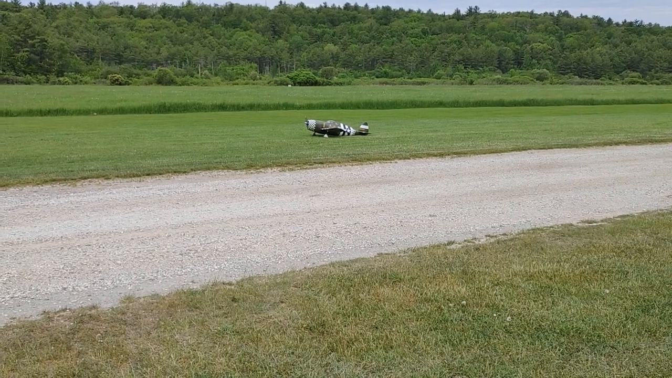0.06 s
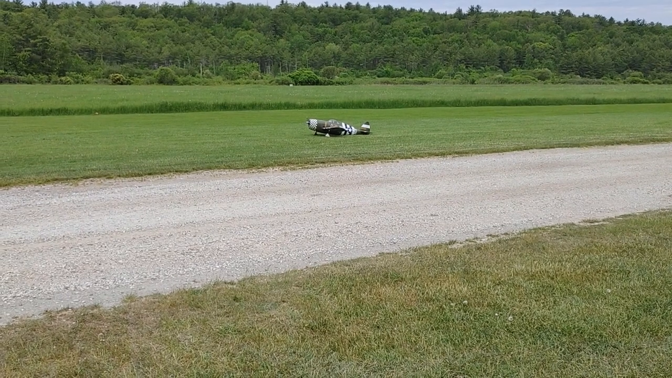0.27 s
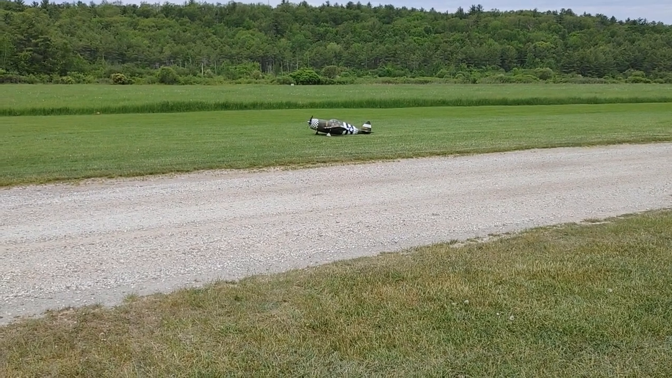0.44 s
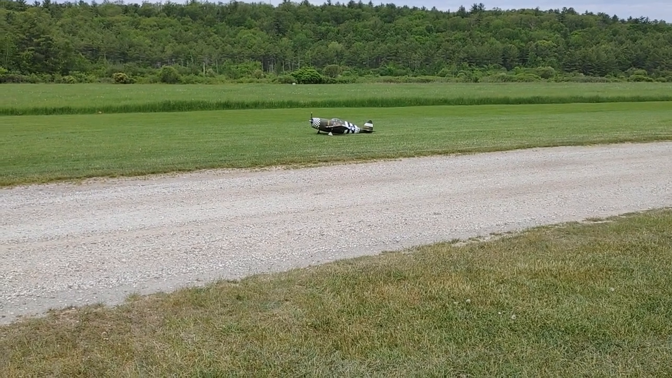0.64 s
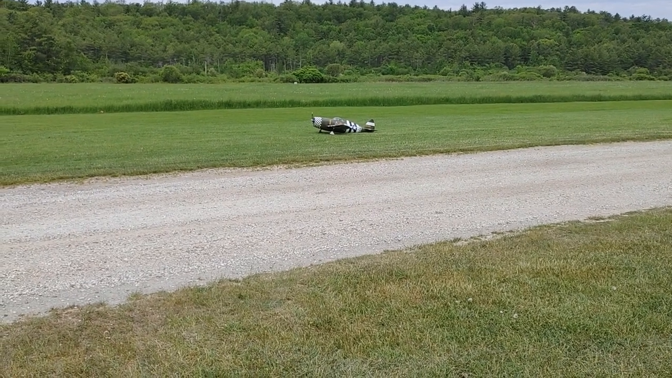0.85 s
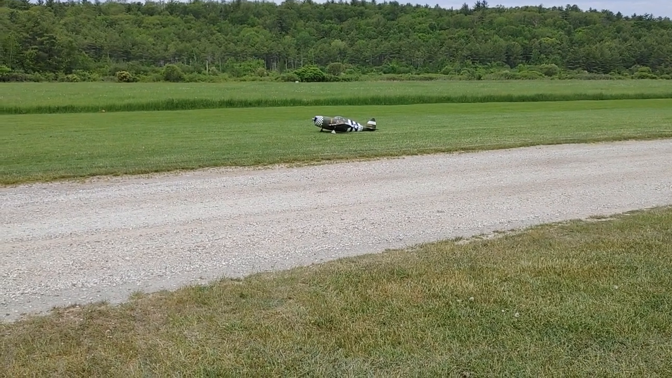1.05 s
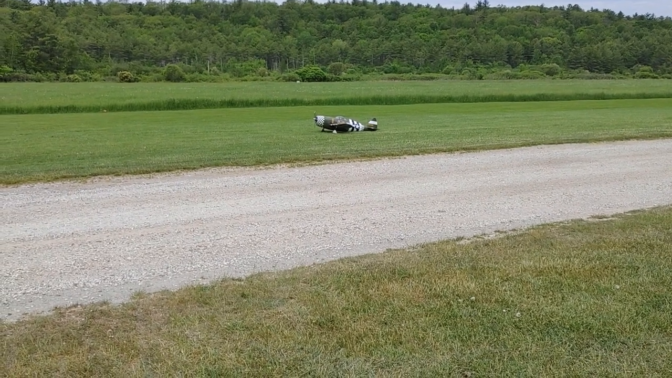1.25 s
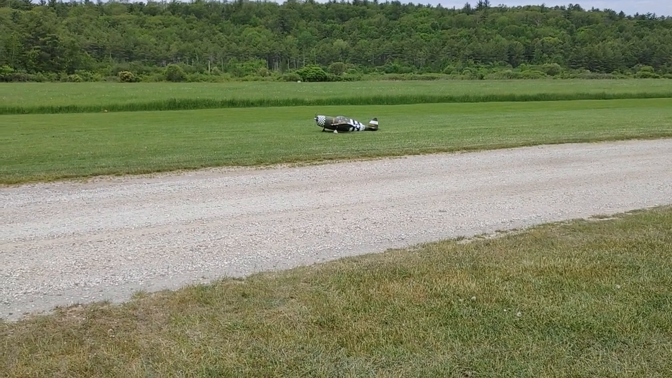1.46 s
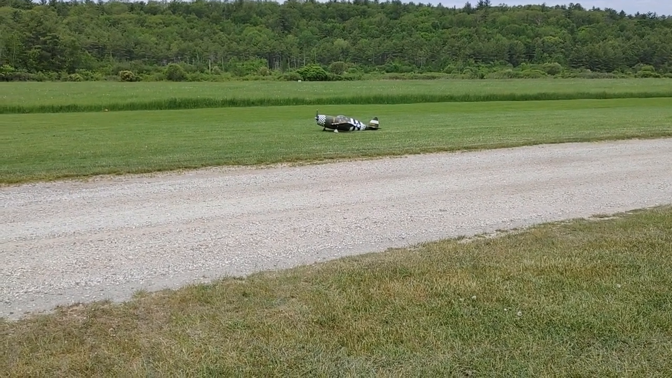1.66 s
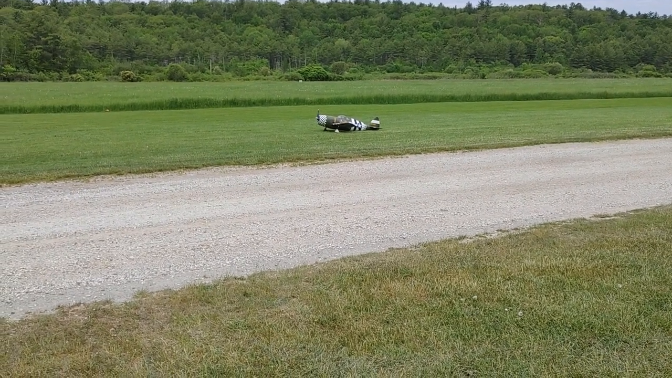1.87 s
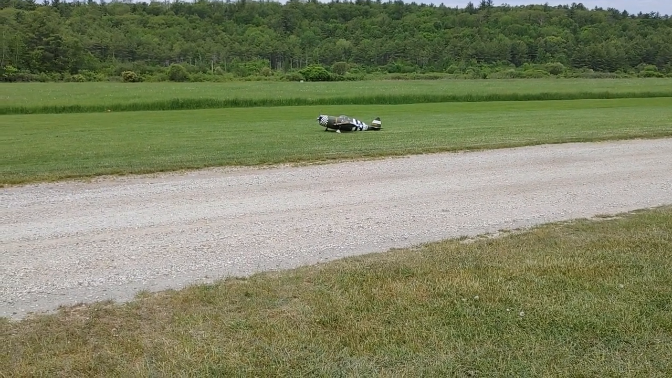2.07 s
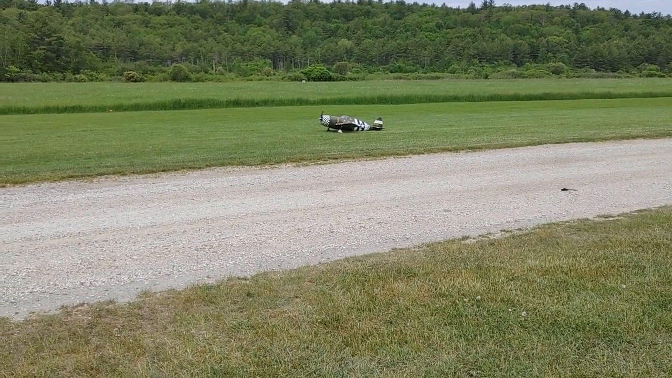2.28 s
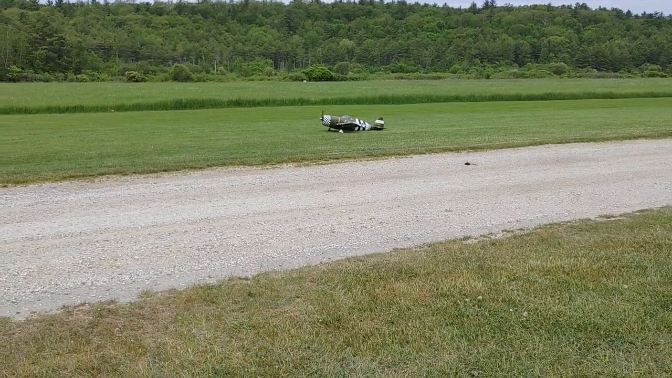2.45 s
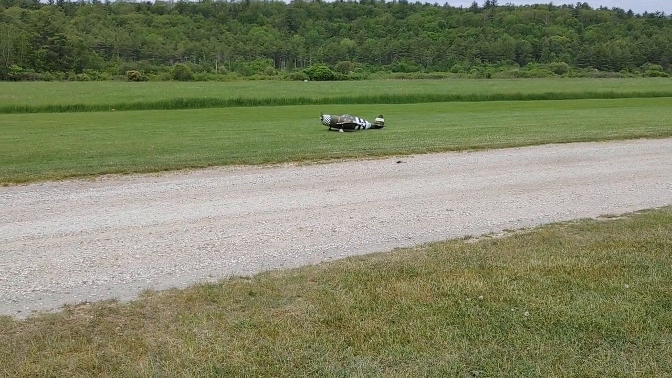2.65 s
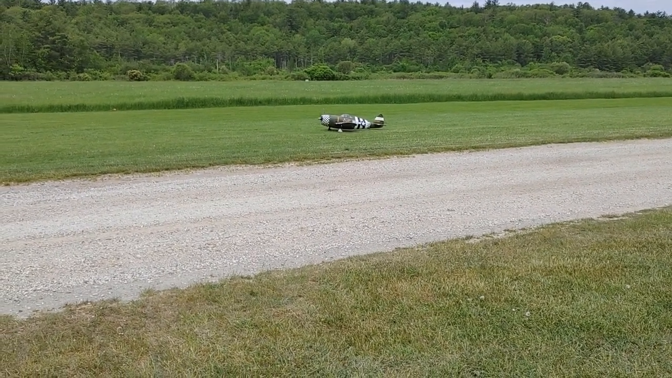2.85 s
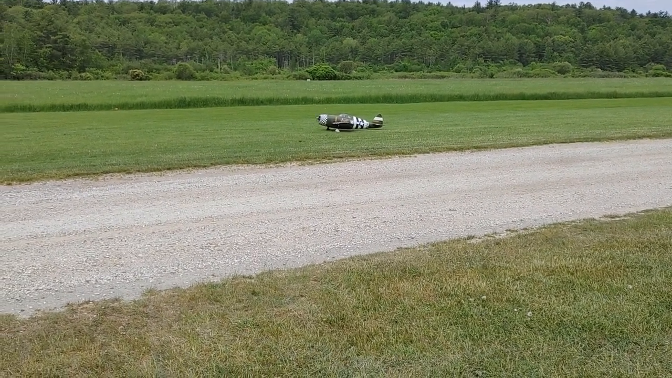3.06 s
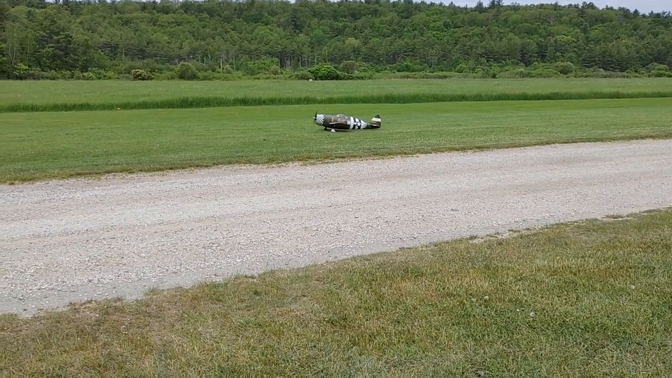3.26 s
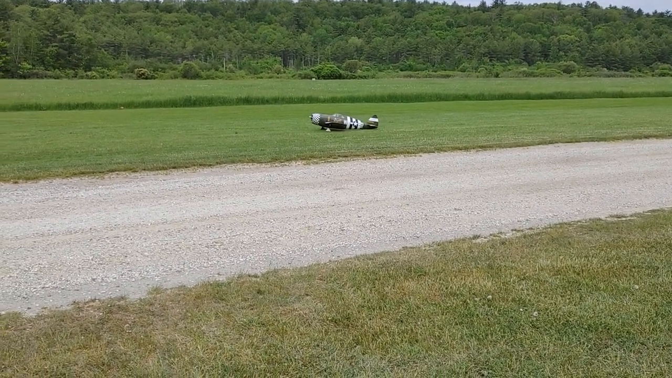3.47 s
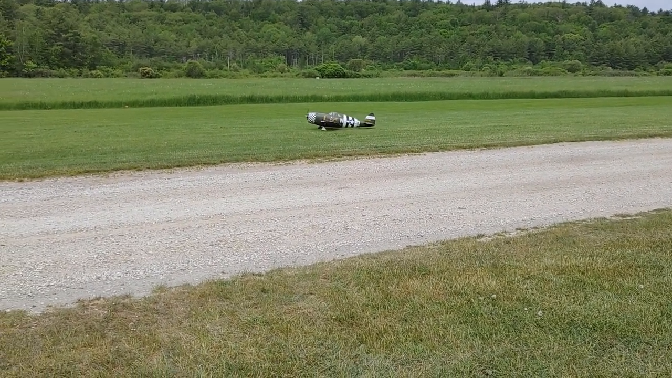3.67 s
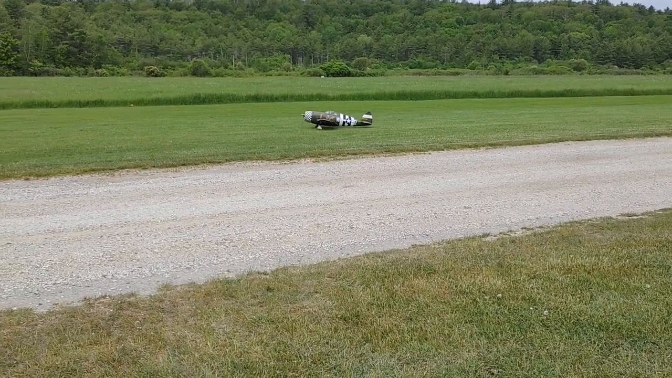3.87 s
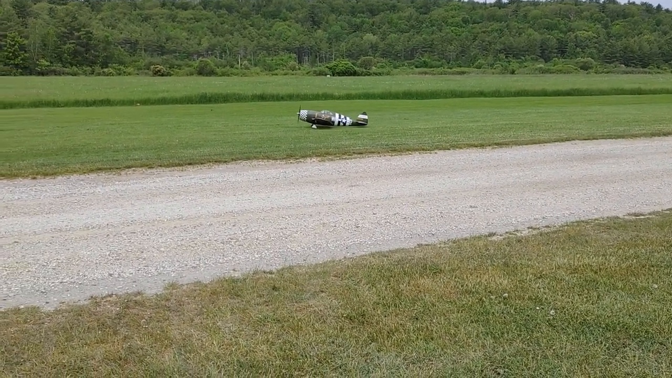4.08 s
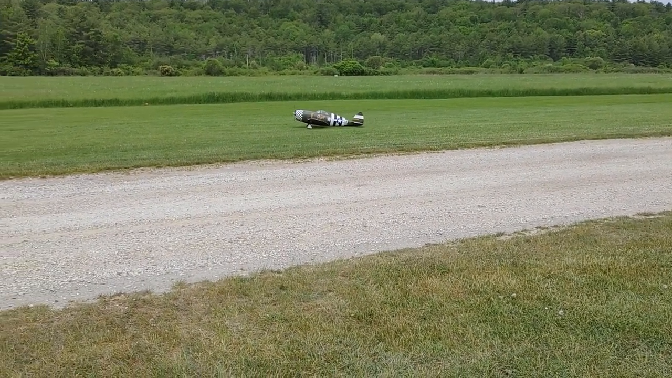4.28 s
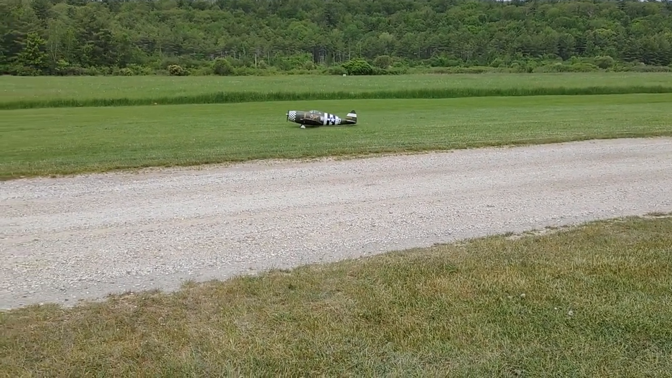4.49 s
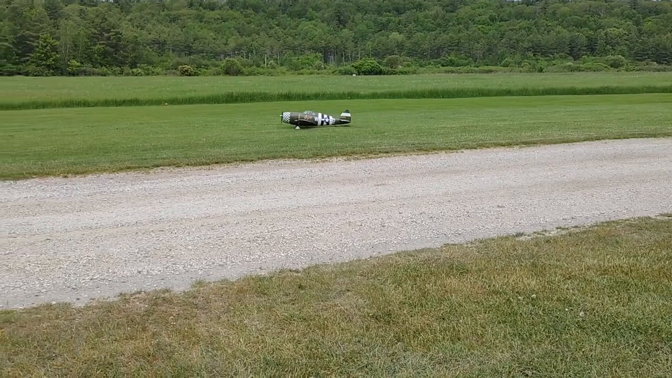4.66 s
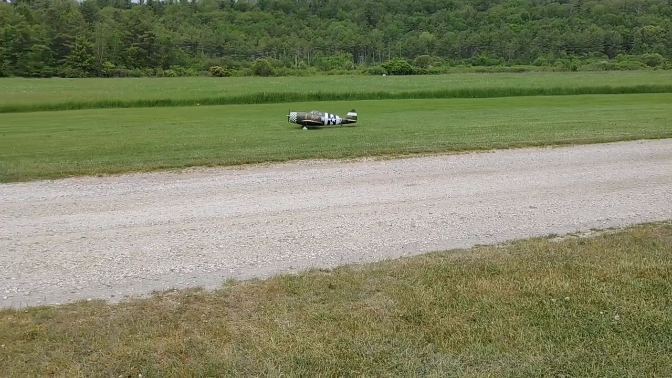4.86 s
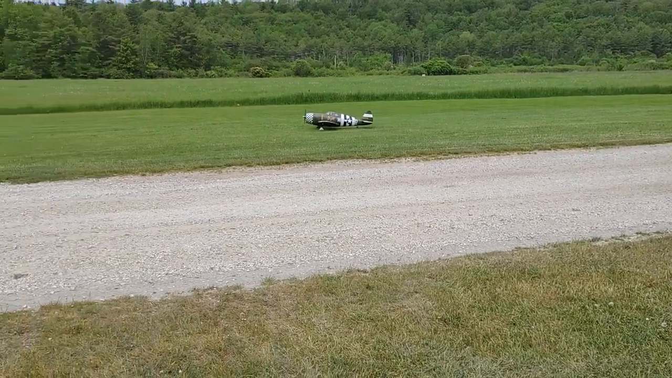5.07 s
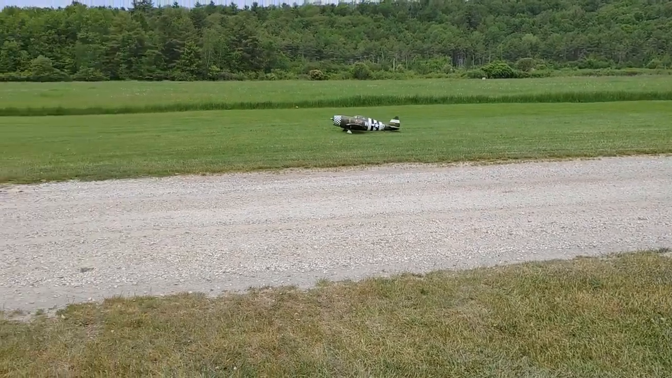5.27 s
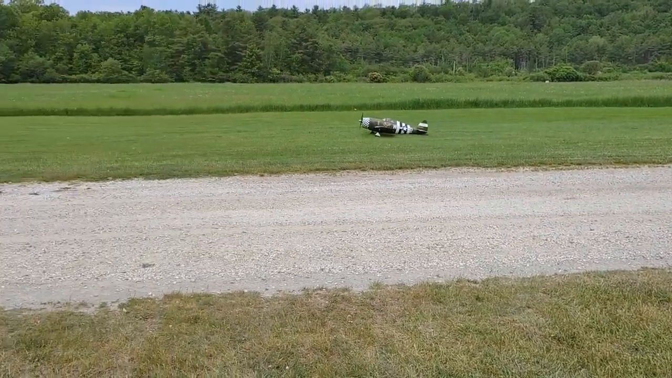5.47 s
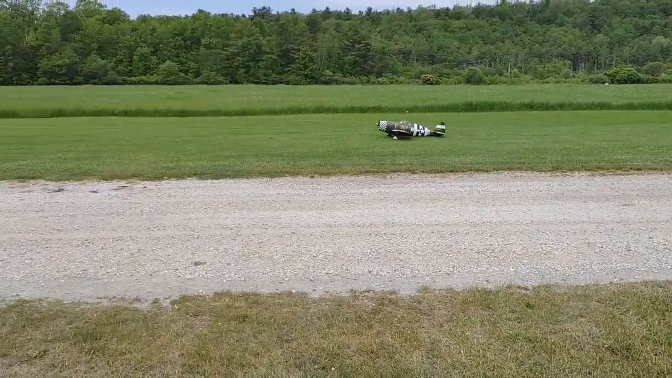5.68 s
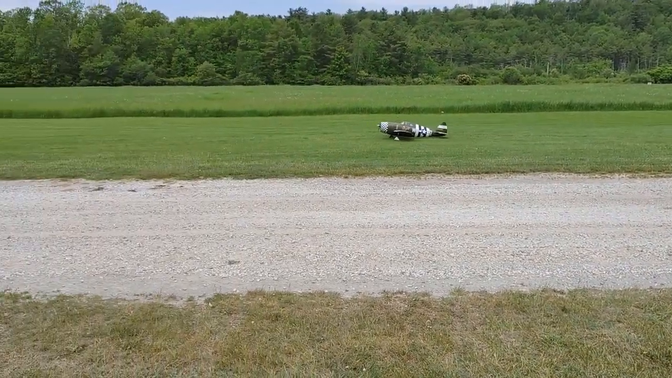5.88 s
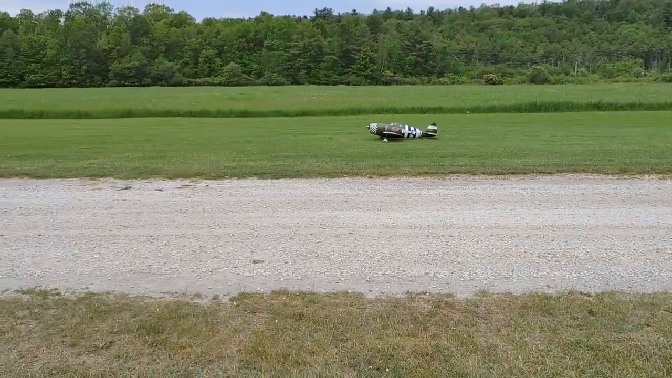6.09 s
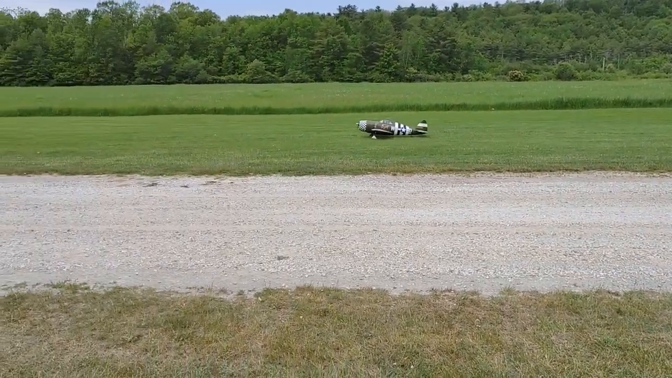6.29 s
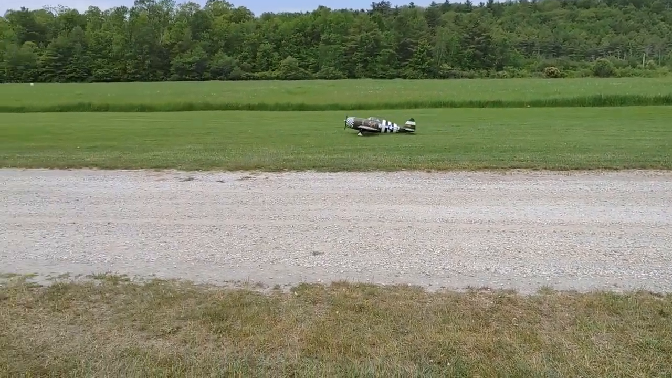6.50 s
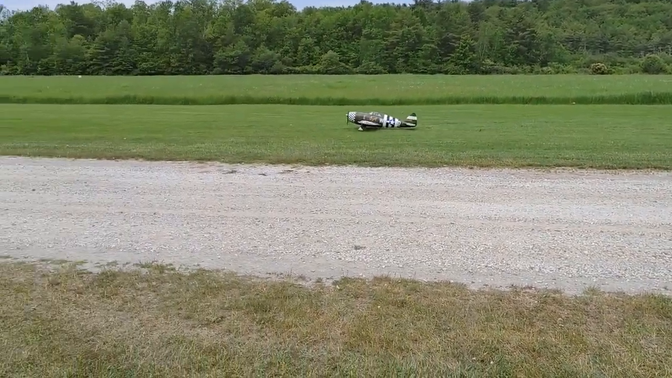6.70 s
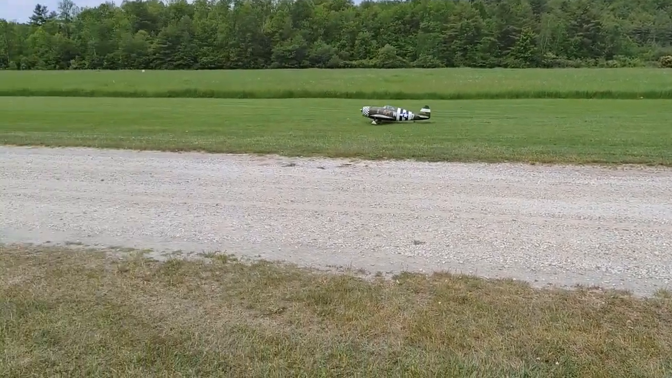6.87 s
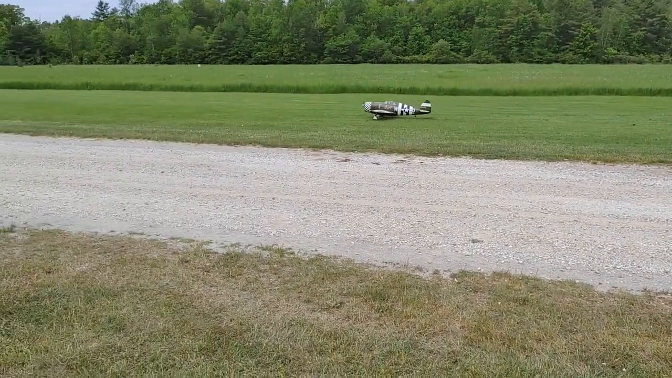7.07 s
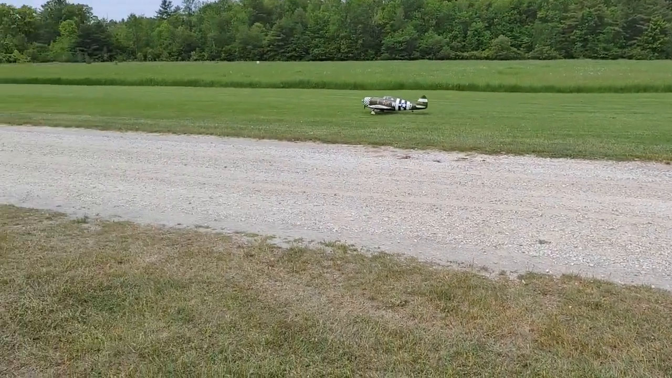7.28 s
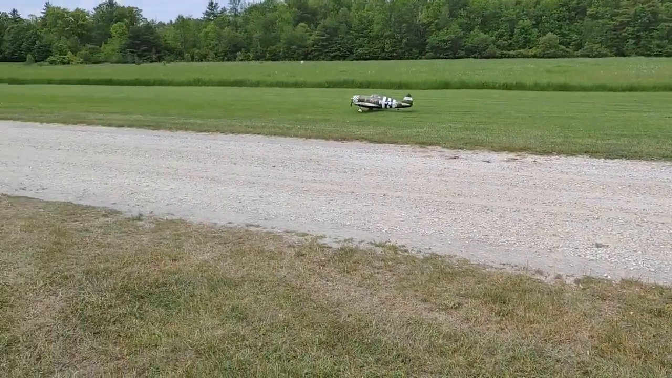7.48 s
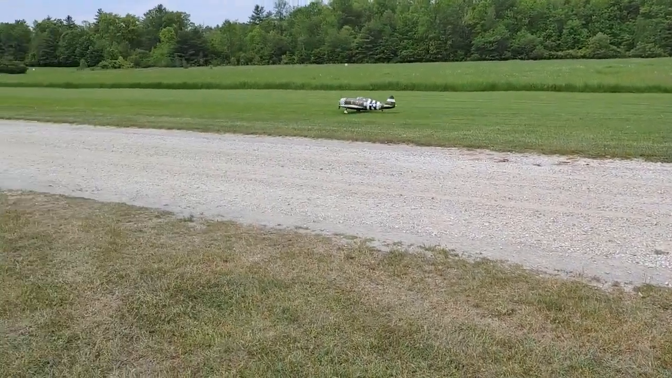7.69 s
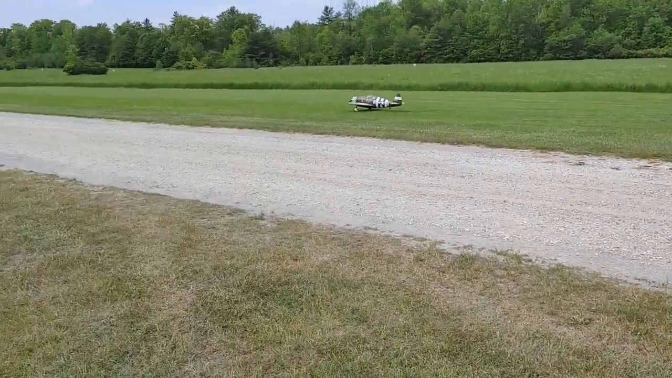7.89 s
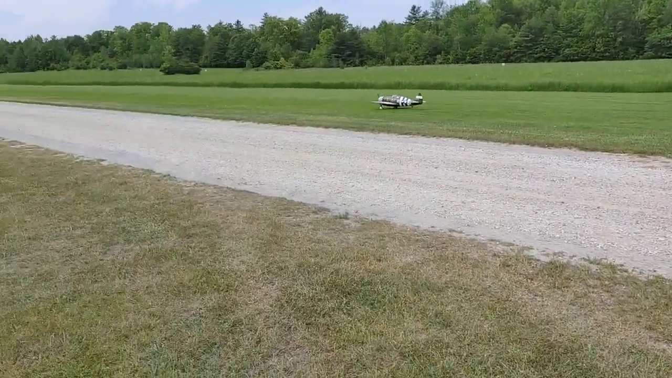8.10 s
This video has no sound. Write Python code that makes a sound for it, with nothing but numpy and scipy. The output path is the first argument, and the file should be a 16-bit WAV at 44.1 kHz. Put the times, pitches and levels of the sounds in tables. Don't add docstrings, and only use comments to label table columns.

```python
import sys
import numpy as np
from scipy import signal
from scipy.fft import rfft, irfft, next_fast_len
from scipy.io import wavfile
from scipy.ndimage import uniform_filter1d, map_coordinates

SR = 44100
rng = np.random.default_rng(int(sys.argv[2]) if len(sys.argv) > 2 else 0)


def linear_from_db(decibels):
    return 10 ** (np.asarray(decibels, float) / 20)


def store_pcm(level_fs):
    pcm = np.round(np.clip(level_fs, -1, 1) * 32767).astype(np.int16)
    wavfile.write(sys.argv[1], SR, np.atleast_2d(pcm).T)


N = 358964
TIME = np.arange(N) / SR

# time in s, shaft speed in turns/s, load level in dB.
THROTTLE = [(0, 36.2, 8), (2.33, 31.3, 11.5), (2.55, 46, 3), (2.66, 53.5, 1.5), (3.68, 55.3, 1),
            (3.85, 49.8, 2.5), (4.218, 56.18, 0.5), (4.423, 64.17, -0.5), (4.619, 67.8, -1),
            (5.18, 68.04, 0), (5.701, 62.22, -1), (6.53, 62.75, -0.5), (6.62, 66.46, 2), (6.85, 84.2, -1.5),
            (7.291, 84.4, -3.5), (7.7, 88.2, -3), (7.911, 88.8, -4.5), (8.14, 91, -4.5)]
# shaft speed in turns/s, level in dB.
CRACK_LAW = [(31, -68), (50, -47), (62, -34.5), (68, -38.5), (80, -33.5), (91, -32)]
AIR_LAW = [(31, -44.5), (51, -42), (63, -33.5), (72, -29.5), (91, -24)]
# centre in Hz, width in Hz, level in dB.
BLOWDOWN = [(227.7, 232, 2.5)]
SURGE_BARK = .07


def unit(x):
    return x / np.sqrt(np.mean(x ** 2) + 1e-20)


def along(points, hz):
    f, v = np.transpose(points)
    return np.interp(np.log(hz + 1), np.log(f + 1), v)


def filtered(x, response):
    m = next_fast_len(N + 8192)
    return irfft(rfft(x, m) * response(np.fft.rfftfreq(m, 1 / SR)), m)[..., :N]


def shaped_noise(spectrum):
    return unit(filtered(rng.standard_normal((2, N)), lambda f: linear_from_db(along(spectrum, f))))


def modes(rows):
    def response(f):
        total = 0
        for k, (c, w, db) in enumerate(rows):
            total = total + (-1) ** k * linear_from_db(db) * 1j * f * w / (c * c - f * f + 1j * f * w)
        return total
    return response


def wobble(rate_hz):
    return map_coordinates(rng.standard_normal(int(N * rate_hz / SR) + 4), [TIME * rate_hz])


def spikes(times, sizes):
    at = np.round(times * SR).astype(int)
    inside = (at >= 0) & (at < N)
    return np.bincount(at[inside], sizes[inside], N)


def puffs(times, sizes, t60):
    t = np.arange(SR // 10) / SR
    shape = linear_from_db(-60 * t / t60) * (1 - np.exp(-t / .0008))
    return signal.fftconvolve(spikes(times, sizes), shape)[:N] * rng.standard_normal((2, N))


def shaft_hz(at=TIME):
    s, hz, load_db = np.transpose(THROTTLE)
    return np.interp(at, s, hz)


def level(law, at=TIME):
    s, hz, load_db = np.transpose(THROTTLE)
    return np.interp(shaft_hz(at), *np.transpose(law)) + np.interp(at, s, load_db)


def surge(at=TIME):
    return np.maximum(shaft_hz(at + .02) - shaft_hz(at - .02), 0) / .04


def gas_heat():
    return np.clip((shaft_hz() - 66) / 20, 0, 1)


def crankshaft(firings):
    turns = np.cumsum(shaft_hz()) / SR
    at = np.interp(firings, TIME, turns)
    whole = np.cumsum(np.maximum(np.round(np.diff(at, prepend=at[0] - 1)), 1))
    slip = whole - at
    slip = np.where(firings > 2.65, uniform_filter1d(slip, size=5), slip)
    return turns + np.interp(TIME, firings, slip), whole.astype(int)


def combustion():
    # time in s, thump in dB, crack in dB re thump.
    idle_firings = [(0.025, -22, -29), (0.092, -20.5, -20), (0.217, -20.5, -23.5), (0.31, -18, -21.5),
                    (0.399, -19.5, -24.5), (0.525, -22.5, -32), (0.59, -20.5, -27), (0.653, -21, -26),
                    (0.718, -20.5, -28.5), (0.752, -21.5, -27), (0.849, -18.5, -29), (0.915, -27.5, -21),
                    (1.013, -21, -27.5), (1.079, -23.5, -22), (1.143, -23, -28), (1.306, -22.5, -24),
                    (1.4, -19.5, -22), (1.494, -18.5, -23), (1.551, -19.5, -29.5), (1.614, -22.5, -23),
                    (1.706, -20.5, -25), (1.897, -22, -29), (1.966, -23.5, -21), (2.031, -20.5, -25.5),
                    (2.097, -20, -23), (2.161, -21.5, -24), (2.291, -20, -27), (2.351, -19.5, -19),
                    (2.408, -16.5, -21.5)]
    half_burns = [.153, .246, .337, .461, .494, .815, .947, 1.208, 1.245, 1.334, 1.674, 1.768, 1.8, 1.832,
                  2.193, 2.38]
    # time in s, thump
    # in dB, crack in dB.
    hard_firings = [(2.462, -13, -30), (2.486, -13, -32), (2.508, -14.5, -33), (2.529, -14.5, -29),
                    (2.55, -14, -35), (2.57, -15, -34), (2.59, -16, -32), (2.609, -14.5, -33),
                    (2.627, -17, -32), (2.646, -13, -33), (2.666, -15, -34.5), (2.683, -14, -36),
                    (2.702, -14, -33), (2.741, -12.5, -33.5), (2.761, -20, -32), (2.778, -12.5, -34),
                    (2.816, -13, -28.5), (2.853, -13.5, -42), (2.873, -18, -41), (2.892, -14, -32.5),
                    (2.912, -16, -42), (2.93, -18, -36), (2.949, -13.5, -38), (2.969, -15.5, -35),
                    (2.987, -15, -37), (3.027, -13, -32), (3.044, -18, -36), (3.082, -12.5, -33),
                    (3.1, -12.5, -34), (3.12, -15, -35), (3.138, -12, -31), (3.176, -14.5, -37),
                    (3.194, -12.5, -28), (3.232, -11.5, -28), (3.249, -14.5, -38), (3.27, -13, -34),
                    (3.306, -12.5, -30.5), (3.326, -17, -32), (3.345, -12, -34), (3.38, -13, -30),
                    (3.399, -9.5, -32.5), (3.436, -13, -35), (3.475, -13.5, -32), (3.512, -11.5, -31),
                    (3.529, -14, -36), (3.548, -15.5, -37), (3.566, -15, -32.5), (3.584, -13, -31.5),
                    (3.605, -16, -41), (3.623, -12.5, -30), (3.644, -15, -37), (3.658, -13, -41),
                    (3.678, -17, -36),
                    (3.715, -12, -30.5), (3.774, -13, -31), (3.812, -16, -35), (3.835, -16, -43),
                   (3.854, -17, -44), (3.874, -18, -43), (3.892, -13.5, -35), (3.914, -13.5, -38),
                   (3.932, -13.5, -33), (3.955, -15, -36), (3.991, -12.5, -35), (4.031, -13.5, -32),
                   (4.049, -13.5, -33), (4.07, -15.5, -41), (4.087, -14, -35), (4.109, -14.5, -41),
                   (4.125, -15.5, -35), (4.142, -14, -39), (4.163, -14, -40), (4.181, -15, -37),
                   (4.197, -12.5, -31.5), (4.218, -15, -33), (4.234, -13, -37), (4.254, -16, -28.5)]
    # shaft speed in turns/s, level in dB.
    thump_law = [(31, -48.5), (36, -44.5), (41, -21), (50, -21), (63, -17), (84, -13.5), (90, -14.5)]
    bark_law = [(31, -57.5), (50, -31.5), (65, -25), (84, -23.5), (91, -15.5)]
    surge_crack, surge_thump = .04, .012
    half_burn_db, half_crack_db, weak_turn_db = -23, -34, -4

    hard = np.array(hard_firings)
    hard[:, 2] -= hard[:, 1] + 9
    halves = [(s, half_burn_db, half_crack_db) for s in half_burns]
    stumble = sorted([*map(tuple, idle_firings), *halves])
    s, hit_db, crack_rel_db = np.vstack([stumble, hard]).T
    idle = np.arange(len(s)) < len(stumble)

    turns, fired = crankshaft(s)
    t = np.interp(np.arange(int(turns[-1]) + 1), turns, TIME, left=0)
    speed = shaft_hz(t)
    luck = rng.standard_normal((len(t), 4))
    opened = np.clip((speed - 37) / 4, 0, 1)
    steady = np.clip((speed - 45) / 22, 0, 1)
    rev = surge(t) * (1 - steady)
    t = t + np.abs(luck[:, 0]) * (.00005 - .00003 * steady)
    uneven_db = (2.8 - 1.9 * steady ** 3) * luck[:, 1]
    per_turn_db = -10 * np.log10(speed)

    usual_db = level(thump_law, t) + per_turn_db
    missed_db = -5 * (speed < 40)
    thump_db = usual_db + uneven_db + surge_thump * rev + missed_db
    thump_db[fired] = np.where(idle, hit_db - 25.5, usual_db[fired] + hit_db + 13.5)
    weak = (t > hard[0, 0]) & (t < hard[-1, 0]) & ~np.isin(np.arange(len(t)), fired)
    thump_db[weak] = usual_db[weak] + weak_turn_db + luck[weak, 1]

    excess_db = thump_db - usual_db
    bark_db = level(bark_law, t) + per_turn_db + SURGE_BARK * rev
    bark_db += (1 + .6 * opened - .8 * steady) * luck[:, 2]
    bark_db += (.4 + .6 * opened * (1 - steady)) * excess_db

    crack_db = level(CRACK_LAW, t) + surge_crack * rev + 0.5 * uneven_db
    crack_db += (3 - steady) * luck[:, 3] - 8 * (1 - steady)
    crack_db[fired] = hit_db + crack_rel_db + 2.5
    return dict(late=turns - .0045 * shaft_hz(), t=t, speed=speed, luck=luck,
                opened=opened, steady=steady, rev=rev, usual_db=usual_db,
                thump_db=thump_db, bark_db=bark_db, crack_db=crack_db)


def breeze():
    # frequency in Hz, level in dB per Hz.
    wind_spectrum = [(10, -3), (30, -1), (70, -2), (150, -28), (400, -120)]
    stir = rng.standard_normal(N) + 0.27 * rng.standard_normal((2, N))
    wind = unit(filtered(stir, lambda f: linear_from_db(along(wind_spectrum, f))))
    return linear_from_db(-67.5 + 1.4 * wobble(3.2)) * wind


def field_hush():
    # frequency in Hz, level in dB per Hz.
    hush_spectrum = [(60, -40), (200, 28), (400, 40), (1000, -91), (6000, -56), (16000, -42)]
    return linear_from_db(-52) * shaped_noise(hush_spectrum)


def air_stream(burn):
    # frequency in Hz, level in dB per Hz.
    rush_spectrum = [(400, 3), (660, 2.5), (1000, -7), (1120, -17), (1310, -3), (1870, -6.5), (2300, -2.5),
                     (2530, -8.5), (2890, -1), (4640, -13), (6130, -7), (7500, -17.5), (9750, -79),
                     (16500, -120)]
    jet_spectrum = [(2940, -61), (5000, -19), (6080, -16), (6950, 14), (7760, 0), (11600, 6), (14900, 5),
                    (16200, -13), (16500, -48)]
    surge_jet = .04
    rush_db = level(AIR_LAW) - 19 * np.clip((46 - shaft_hz()) / 11, 0, 1)
    jet_db = level(CRACK_LAW) - 10.0 + 11 * gas_heat() + surge_jet * surge()
    throb = linear_from_db(2 * np.cos(2 * np.pi * burn["late"]) + 1.06 * wobble(20))
    rush = linear_from_db(rush_db + 3.5) * shaped_noise(rush_spectrum)
    return throb * (rush + linear_from_db(jet_db) * shaped_noise(jet_spectrum))


def intake_rattle(burn):
    # centre in Hz, width in Hz, level in dB.
    crankcase = [(2330, 240, 4.5), (2740, 690, -6), (3600, 105, 1), (4120, 89, 2), (5110, 590, -2)]
    suction = puffs(burn["t"] - 0.31 / burn["speed"], linear_from_db(3.5 * burn["luck"][:, 2]), t60=.045)
    rattle = unit(filtered(suction, lambda f: modes(crankcase)(f) ** 2))
    return linear_from_db(level(AIR_LAW) - 11.0 - 1.5 * gas_heat()) * rattle


def port_crack(burn):
    # frequency in Hz, level in dB per Hz.
    crack_spectrum = [(1470, -28), (2500, 0), (2840, -6), (3190, -0.5), (3570, -5), (3890, -8), (5010, -4),
                      (6250, 0.5), (6870, -3), (7980, -20.5), (11800, -13), (15600, -21), (16500, -60)]
    # centre in Hz, width in Hz, level in dB.
    fins = [(3638, 10.7, 19), (4150, 180, 3), (5140, 110, 0), (6400, 250, 6.5), (7120, 71, -37),
            (8540, 53, -80), (11740, 190, 12), (14000, 730, -20)]
    # time in s, level in dB.
    stray = [
        (1.753, -28),
    ]
    tick_s, tick_db = np.transpose(stray)
    burst = puffs(burn["t"] + .0043, linear_from_db(burn["crack_db"]), t60=.03)
    burst += puffs(tick_s, linear_from_db(tick_db - 4.0), t60=0.0074)
    return filtered(burst, lambda f: linear_from_db(along(crack_spectrum, f) + 21.5)
                    * (1 + linear_from_db(-6.0) * modes(fins)(f)))


def shaft_orders(burn):
    # shaft speed in turns/s, level in dB.
    second_order = [(31, -70), (51, -56), (56, -38), (63, -33), (68, -27), (82, -18.5), (91, -13.5)]
    third_order = [(31, -54), (54.4, -49.5), (56.3, -40), (62, -23), (68, -20), (83, -21.5), (89, -13.5)]
    fourth_order = [(31, -68), (50, -38), (54, -38), (57, -33), (62, -29.5), (68, -29), (84, -29),
                    (91, -32.5)]
    second_db = level(second_order)
    levels_db = second_db - 18, second_db, level(third_order), level(fourth_order)
    lags_turns = -.32, -.15, -.25, .15
    tones = np.zeros(N)
    for k, (db, lag) in enumerate(zip(levels_db, lags_turns)):
        phase = 2 * np.pi * ((k + 1) * burn["late"] + lag + .015 * wobble(25))
        tones -= linear_from_db(db + 6.5 + .6 * wobble(14)) * np.cos(phase)
    return tones * np.interp(TIME, burn["t"], burn["opened"])


def pipe_bark(burn):
    # centre in Hz, width in Hz, level in dB.
    pipe_cool = [(741, 98.4, 0.5), (555, 68, 0), (819.3, 13, -3.5)]
    pipe_hot = [(797, 114, 0.5), (590.4, 15, 2.5), (907, 40, -6), (1200, 29.2, -4)]
    wheeze = [(704.5, 43, 0)]
    t, opened, heat = burn["t"], burn["opened"], gas_heat()
    breath_db = burn["bark_db"] - SURGE_BARK * burn["rev"] + 33 - 13 * opened
    breath = puffs(t, linear_from_db(breath_db), t60=.09)
    blow_sizes = -linear_from_db(burn["bark_db"] + 62) * (.3 + .7 * opened)
    blows = spikes(t + .003 - .0025 * opened, blow_sizes) + breath[0]
    bark = filtered((1 - heat) * blows, lambda f: modes(pipe_cool)(f) ** 2)
    bark += filtered(heat * blows, lambda f: modes(pipe_hot)(f) ** 2)
    idle_breath = breath[1] * np.interp(TIME, t, 1 - opened)
    return bark + linear_from_db(9.5) * filtered(idle_breath, lambda f: modes(wheeze)(f) ** 2)


def muffler_ring(burn):
    # centre in Hz, width in Hz, level in dB.
    can_idle = [(157, 54, 7), (179.5, 14.3, 11), (278.7, 7.7, -2), (339, 37, -2.5)]
    can_open = [(167, 35, 3), (237.4, 23, 3.5), (267.6, 54, -4.5), (372, 8.7, -8)]
    opened, luck = burn["opened"], burn["luck"]
    scatter_db = (2.5 - 1.2 * opened) * luck[:, 0]
    pumped = linear_from_db(burn["usual_db"] + 71.0 + scatter_db - 13.6 * opened)
    pumped += linear_from_db(burn["thump_db"] + 43.0 - 5.6 * opened)
    choked = np.clip(burn["rev"] / 8, 0, 1) * np.clip((burn["speed"] - 37) / 6, 0, 1)
    pumped *= linear_from_db(-6 * choked)
    pumped *= (1 - burn["steady"]) ** 2
    slack_s = .0004 * (1 - opened) * luck[:, 2]
    at = burn["t"] + 0.004795 + slack_s
    ring = np.zeros(N)
    for share, can in ((1 - opened, can_idle), (opened, can_open)):
        ring += filtered(spikes(at, share * pumped), lambda f: modes(BLOWDOWN)(f) ** 2 * modes(can)(f))
    return ring


def exhaust_thump(burn):
    # centre in Hz, width in Hz, level in dB.
    blowdown_open = [(316.7, 252, 0.014)]
    t, opened, thump_db = burn["t"], burn["opened"], burn["thump_db"]

    def idle_slug(f):
        roll_off = 1 / (1 + 1.1j * f / 370 - (f / 370) ** 2) ** 2
        return modes(BLOWDOWN)(f) ** 4 * roll_off

    def open_slug(f):
        return modes(blowdown_open)(f) ** 4 * 300 / (1 + 1j * f)

    idle_hits = spikes(t + .0004, (opened - 1) * linear_from_db(thump_db + 65))
    open_hits = spikes(t - .0005, opened * linear_from_db(thump_db + 61.5))
    return filtered(idle_hits, idle_slug) + filtered(open_hits, open_slug)


def engine():
    burn = combustion()
    voiced = exhaust_thump(burn) + muffler_ring(burn) + pipe_bark(burn) + shaft_orders(burn)
    return voiced, port_crack(burn) + intake_rattle(burn) + air_stream(burn)


def ports(pair):
    # frequency in Hz, likeness from 0 to 1.
    alike = [(100, .999), (600, 0.97), (1200, 0.82), (4000, 0.75), (8000, 0.58), (14000, 0.6)]
    # frequency in Hz, left minus right in dB.
    tilt = [(60, 0.0), (92, 0.0), (140, 0.0), (210, 0.0), (330, 0.5), (500, -0.5), (770, 0.5), (1170, -2.0),
            (1790, -5.5), (2740, -5.0), (4190, 2.0), (6410, -1.0), (7900, 9), (11000, 10.5), (12300, -1),
            (15000, -0.5)]
    # frequency in Hz, phase in radians.
    lead = [(0, 0), (2330, -0.6), (3450, -11.1), (4480, -13.3), (5250, -13.6), (5860, -14.8), (7150, -18.9),
            (11300, -18.2), (11700, -20.2), (12800, -19.7), (13400, -21.9), (14000, -22.0), (14600, -25.1),
            (16300, -25.1)]
    pan_start_s, pan_lasts_s, pan_lag_samples = 5.1, .45, 3
    side = np.array([[1], [-1]])

    def blend(f):
        angle = np.arccos(np.clip(along(alike, f), 0, 1)) / 2
        return np.array([np.cos(angle), np.sin(angle)])

    def shade(f):
        bass = 1 - .55 * np.exp(-f / 900)
        phase = side * bass * np.interp(f, *np.transpose(lead))
        return linear_from_db(side * along(tilt, f) / 2) * np.exp(.5j * phase)

    common, apart = filtered(pair, blend)
    left, right = filtered(common + side * apart, shade)
    lag = pan_lag_samples * np.clip((TIME - pan_start_s) / pan_lasts_s, 0, 1)
    return np.array([map_coordinates(left, [np.arange(N) - lag], order=5), right])


def scene():
    voiced, noisy = engine()
    echo_s = np.array([[.00115], [.00142]])
    echoed = filtered(ports(noisy), lambda f: 1 + 0.24 * np.exp(-2j * np.pi * f * echo_s))
    return ports(field_hush() + voiced * [[1], [0]]) + echoed


def low_pass(x):
    return signal.sosfilt(signal.butter(12, 16720, fs=SR, output="sos"), x)


def record(dry):
    low_cut = lambda f: ((1j * f / 100) ** 2 / (1 + 1.4j * f / 100 - (f / 100) ** 2)) ** 2
    return low_pass(filtered(dry, low_cut) + breeze())


dry = scene()
out = record(dry)
store_pcm(out)
```